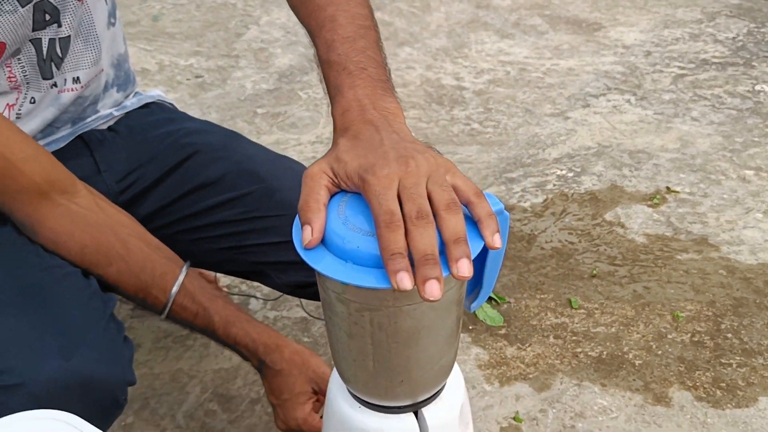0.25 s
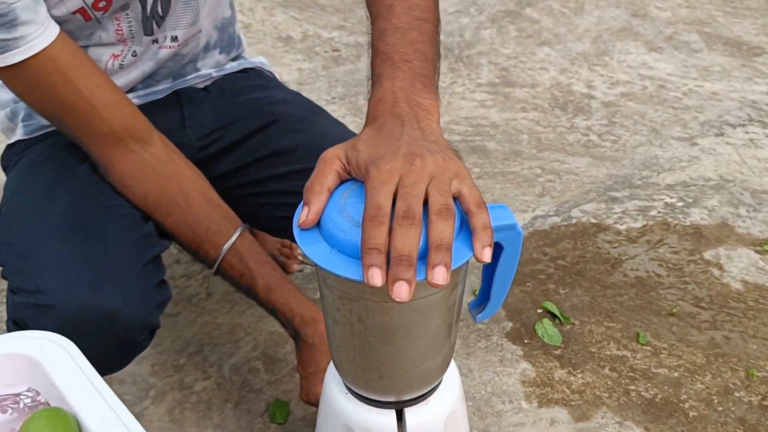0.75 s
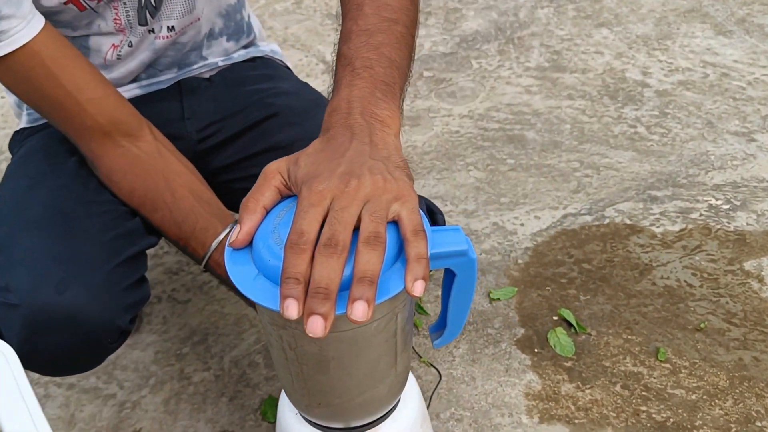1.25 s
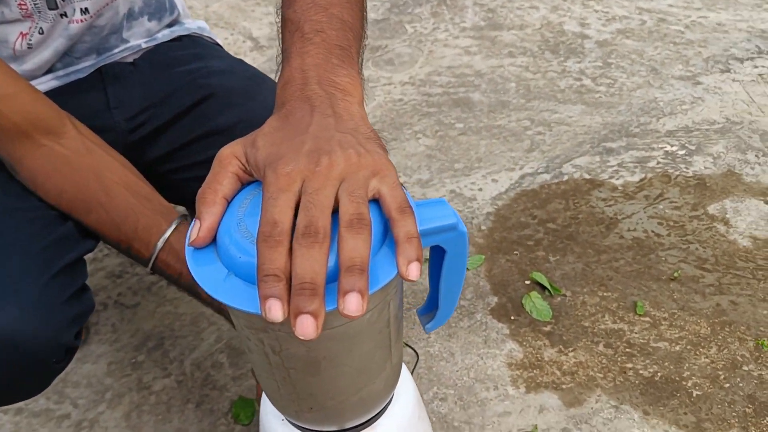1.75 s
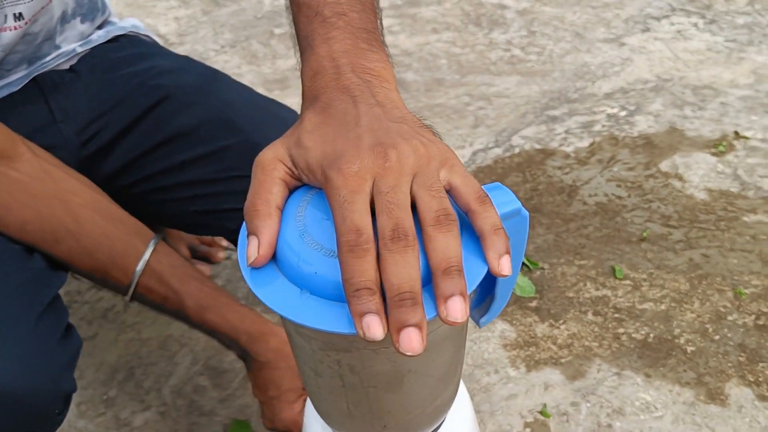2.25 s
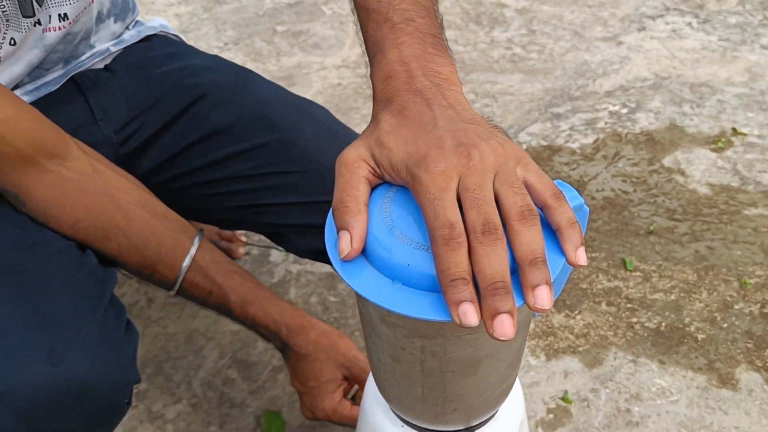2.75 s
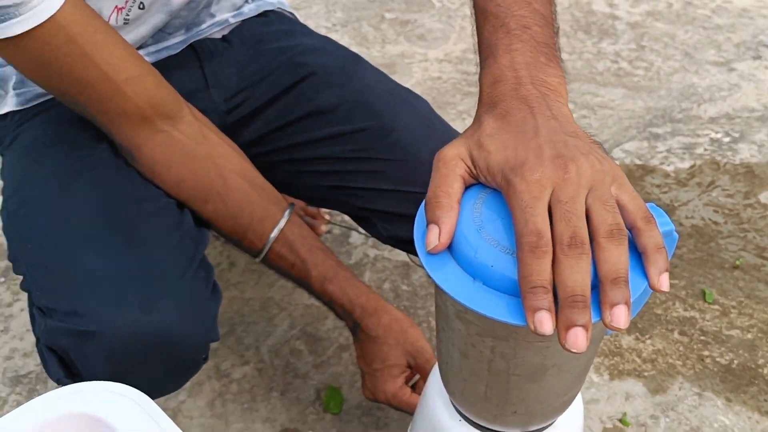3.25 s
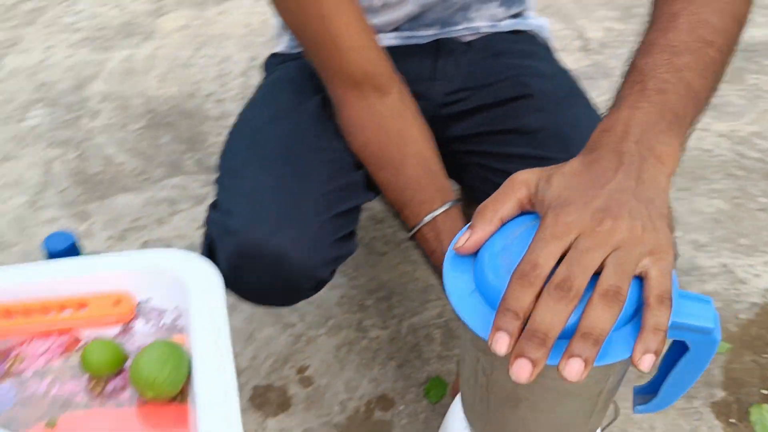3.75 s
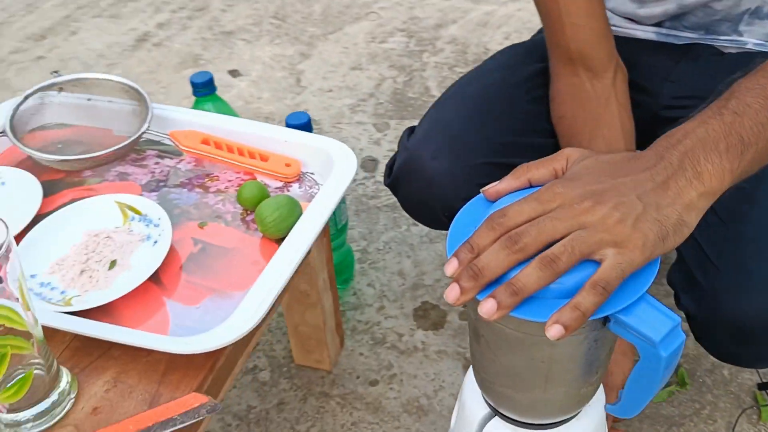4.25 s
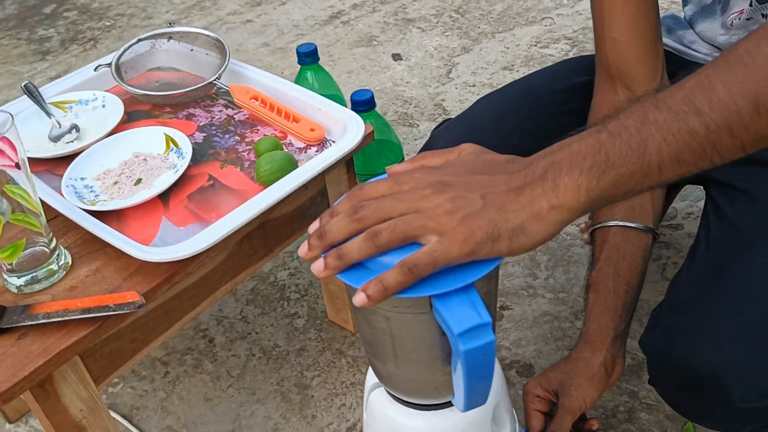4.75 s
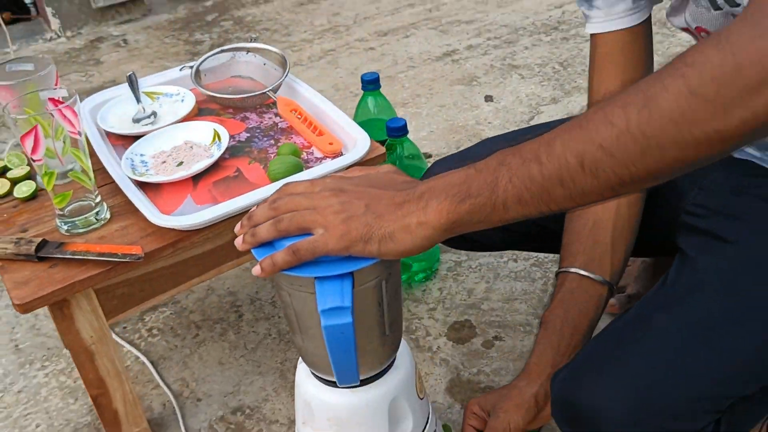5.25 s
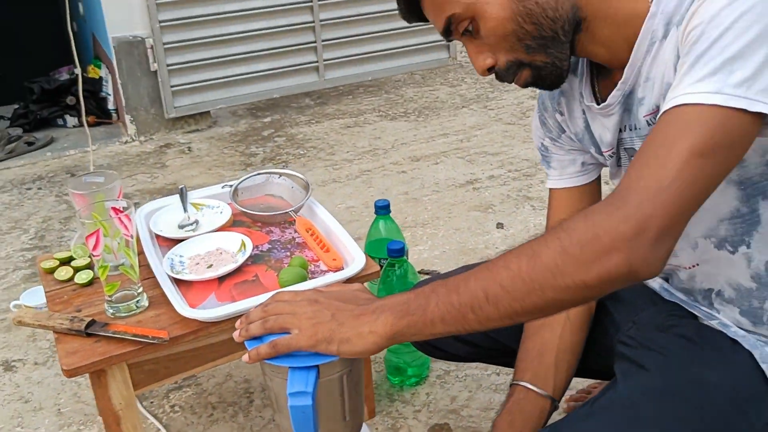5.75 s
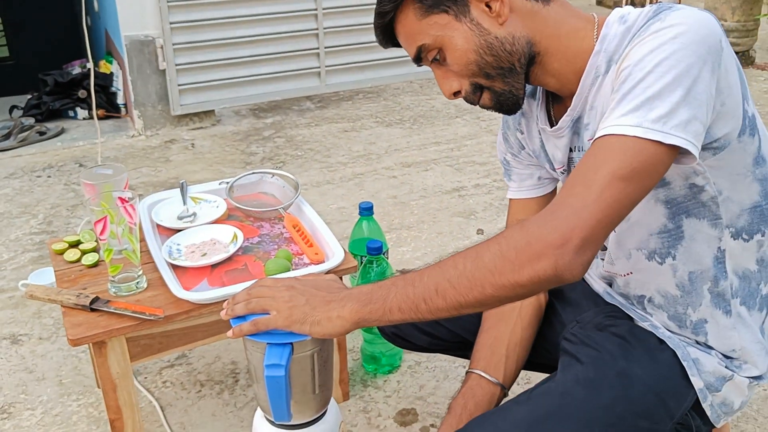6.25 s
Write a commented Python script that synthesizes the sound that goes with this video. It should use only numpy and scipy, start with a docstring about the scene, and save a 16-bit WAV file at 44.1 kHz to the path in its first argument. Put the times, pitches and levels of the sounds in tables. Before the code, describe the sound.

A mixer grinder is already at full speed, close and dry, and never stops. A strong whine around 2.5 kHz buzzes at a hundred pulses a second, swaying in loudness and pitch six or seven times a second as the load sloshes. Beneath it are a low rotor hum, a growl of blade tones and a wet, midrange churning roar coloured by the steel jar. Lumps burst and ice chips click in the first half second, with scattered ticks until about 3.5 and a last one near 4.4. From 0.6 the low slosh eases; around 1.6 to 2.3 the pitch sinks slightly and the wobble quickens to about nine a second. At 3.7 the churning drops noticeably and grows smoother, the swaying shallower. At 5.3 the sound vanishes for about three hundredths of a second, then returns with a softer, rougher, stuttering whine and calmer churn, still running at 6.5.

```python
"""A churning roar and a pulsing electric whine: a mixer grinder blends ice and leaves in a steel jar.
The sloshing load drags on the motor, so its mains-pulsed whine sweeps in and out of a jar resonance.
Blade tones follow the same shaft; filtered noise makes the turbulence, and decaying noise bursts the ice.
The churning calms and the ice ticks thin out as the mix gets smooth; late on, the sound cuts out briefly."""
import sys
import numpy as np
from scipy import signal
from scipy.fft import rfft, irfft
from scipy.io import wavfile
from scipy.ndimage import uniform_filter1d, minimum_filter1d

SR = 44100
rng = np.random.default_rng(int(sys.argv[2]) if len(sys.argv) > 2 else 0)


def digitize_waveform(pressure):
    """Quantize a signal to 16-bit integers and store it at the path in sys.argv[1].

    Rows of a 2-D input are taken as channels; values are limited to [-1, 1].
    """
    field = np.atleast_2d(pressure).T
    bounded = np.clip(field, -1, 1)
    quanta = np.round(bounded * 32767).astype(np.int16)
    wavfile.write(sys.argv[1], SR, quanta)


N = 286322
TIME = np.arange(N) / SR
FREQS = np.fft.rfftfreq(N, 1 / SR)


def gain_of(db):
    """Decibels to amplitude."""
    return 10 ** (np.asarray(db) / 20)


def evened(x):
    """Scales to rms 1."""
    return x / np.sqrt(np.mean(abs(x) ** 2) + 1e-20)


def curve(rows):
    """The columns of a table (s, value, ..) at every sample."""
    s, *columns = np.transpose(rows)
    return [np.interp(TIME, s, column) for column in columns]


def read(points, hz):
    """Interpolates a spectrum table on a log-frequency axis."""
    f, value = np.transpose(points)
    return np.interp(np.log(hz + 1), np.log(f), value)


def coloured(x, db):
    """Filters by a gain in dB at each frequency."""
    return irfft(rfft(x) * gain_of(db), N)


def wander(rate_hz):
    """Smooth random signal of rms 1, changing up to about rate_hz."""
    spectrum = rfft(rng.standard_normal(N))
    return evened(irfft(spectrum / (1 + (FREQS / rate_hz) ** 2), N))


# Motor tone levels. Each row: time in seconds, whine in dB, overtones in relative dB, roughness 0-1.
MOTOR_LEVELS = [(0, -13, -2, .5), (.55, -8.5, 4.5, 0.3), (1.3, -10, 2, 0.2), (1.6, -13.5, 2, 0.2),
                (2.2, -13.8, -2, 0.02), (3.7, -14, -1.5, .1), (5.25, -14.5, -2, .1), (5.45, -16.5, -9, 0.9),
                (5.9, -15, -3, 0.8), (6.49, -16, -9, .8)]
# Radiation of the whine by the jar. Each row: frequency in Hz, gain in dB.
WHINE_RADIATION = [(2270, -16), (2370, -1), (2430, 5), (2490, 2.5), (2530, 2), (2560, -7), (2605, -29),
                   (2660, -19.5), (2730, -23), (2850, -40)]
# Overtones of the shaft. Each row: multiple of the shaft speed, relative level in dB.
MOTOR_OVERTONES = [(24, -48), (36, -42), (48, -54), (60, -68), (72, -77)]
# Low sounds. Each row: time in seconds, once-a-turn hum of the unbalanced rotor in dB,
# gulping of the vortex in relative dB.
LOW_LEVELS = [(0, -25, -44.5), (.6, -29.5, -44.5), (2.25, -36, -47.5), (2.6, -34, -54), (5, -32, -51),
              (6.49, -34, -51)]
MAINS_HZ = 50


def motor(angle, pulsing=0.93, damping_db=0.3, wetting_db=3):
    """Twelve rotor slots sing, pulsing twice per mains cycle; liquid on the wall damps the overtones."""
    slots, jitter_rad, overtone_pulsing, flutter_db = 12, 0.5, 0.55, 2.6
    stutter_hz, stutter_db = 50, 5.5
    pull = np.cos(2 * np.pi * 2 * MAINS_HZ * TIME)
    whine_db, overtones_db, rough = curve(MOTOR_LEVELS)
    shaken = angle + jitter_rad * rough * wander(stutter_hz) / slots

    pulsed = np.cos(slots * shaken) * (1 + pulsing * pull)
    whine = coloured(pulsed, read(WHINE_RADIATION, FREQS))
    dips_db = stutter_db * rough * np.maximum(wander(stutter_hz), 0)
    whine *= gain_of(whine_db - dips_db - damping_db * slosh(lag=0.24, power=0.12))

    overtones = np.zeros(N)
    for multiple, db in MOTOR_OVERTONES:
        overtones += gain_of(db + flutter_db * wander(30)) * np.cos(round(multiple) * shaken)
    overtones *= 1 + overtone_pulsing * pull
    overtones *= gain_of(overtones_db - wetting_db * slosh(lag=0.28))

    hum = gain_of(curve(LOW_LEVELS)[0] + 0.5 * wander(9.8)) * np.cos(angle)
    return np.sqrt(2) * (whine + jar(overtones) + hum)


# Mean motor speed, sinking as the mix thickens. Each row: time in seconds, shaft turns per second in Hz.
SHAFT_SPEED = [(0.0, 225.5), (0.35, 223.9), (1.35, 223.0), (1.58, 220.7), (1.8, 216.5), (2.3, 214.4),
               (2.85, 214.1), (3.05, 213.0), (3.66, 213.9), (3.93, 213.8), (4.17, 210.0), (4.35, 212.4),
               (4.56, 210.1), (4.75, 212.3), (5.4, 207.3), (5.77, 210.9), (6.15, 211.4), (6.45, 206.5)]
SWING_HZ = 4  # peak swing of the shaft speed in a slosh of full depth


def shaft_speed():
    """Each slosh drags the motor under its mean speed and lets it go again (Hz)."""
    return curve(SHAFT_SPEED)[0] + SWING_HZ * slosh() + 0.2972 * wander(5.06)


# Rocking of the load, shallower as it gets smooth. Each row: time in seconds, sloshes per second, depth 0-1.
SLOSHING = [(0.0, 6.683, 0.75), (0.5, 6.542, 0.85), (1.3, 7.221, 0.8), (1.8, 8.025, 1.0), (2.4, 8.751, 0.9),
            (3.4, 9.127, 0.6), (4.2, 9.173, 0.42), (5.2, 9.283, 0.25), (5.5, 11.4, 0.15), (6.49, 8.3, 0.12)]


def slosh(lag=0.0, power=0.81):
    """Load rocking, highest when blades run free; lag in cycles, power < 1 keeps shallow sloshes felt."""
    rate_hz, depth = curve(SLOSHING)
    cycles = np.cumsum(rate_hz) / SR
    return depth ** power * np.cos(2 * np.pi * (cycles - lag))


# Blades beating the liquid. Each row: multiple of the shaft speed, steady part in relative dB,
# turbulent part in relative dB.
BLADE_TONES = [(2, -23.5, -27), (3, -24, -15.5), (4, -7.5, -7), (5, -21.5, -14.5), (6, -13.5, -9),
               (7, -30, -17), (8, -23.5, -25), (10, -28, -20), (20, -29.5, -37.5)]


def blades(angle, surge, smear_hz=32, surge_db=0.2, follow=0.47, level_db=-16.5):
    """Each blade tone has a steady core and a skirt smeared by turbulence."""
    out = np.zeros(N)
    for multiple, steady_db, turbulent_db in BLADE_TONES:
        eddies = wander(smear_hz) + 1j * wander(smear_hz)
        height = np.sqrt(2) * gain_of(steady_db) + gain_of(turbulent_db) * eddies
        phase = round(multiple) * angle + 2 * np.pi * rng.random()
        out += (height * np.exp(1j * phase)).real
    churn_db = curve(TURBULENCE_LEVELS)[1]
    return out * gain_of(level_db + follow * (churn_db - churn_db.mean()) + surge_db * surge)


# Turbulence in three bands. Each row: time in seconds, low slosh, churn and spray, each in relative dB.
TURBULENCE_LEVELS = [(0, -20.5, -11.5, -19), (0.58, -21, -11.5, -19.5), (0.75, -25.5, -12.5, -21.8),
                     (2.4, -27, -13, -22.5), (3.62, -26, -12.5, -23.5), (3.78, -26, -18, -25),
                     (5.25, -26.5, -18.5, -26), (5.45, -28.5, -20.5, -28), (6.49, -31.5, -21, -28.5)]
# Spectrum of the churning. Each row: frequency in Hz, relative density in dB per Hz.
CHURN_SPECTRUM = [(25, -29), (62, -37), (110, -19.5), (165, -16.5), (240, -9), (340, -4), (560, -5.5),
                  (950, 3.5), (1400, 3), (2200, -1), (2900, -11), (4700, -16.5), (6500, -24), (8500, -28.5),
                  (11500, -43), (15500, -50)]


def churning(surge, low_hz=700, high_hz=2700):
    """Low slosh, churn and spray swell with the falling liquid and burst with each splash."""
    low = 1 / (1 + (FREQS / low_hz) ** 8)
    high = 1 - 1 / (1 + (FREQS / high_hz) ** 8)
    noise = rfft(jar(bubbling())) * gain_of(read(CHURN_SPECTRUM, FREQS))
    deep = evened(irfft(noise * low, N))
    churn = evened(irfft(noise * (1 - low - high), N))
    spray = evened(irfft(noise * high, N))

    deep_db, churn_db, spray_db = curve(TURBULENCE_LEVELS)
    splash_db = splashes()
    deep *= gain_of(deep_db + 0.43 + 1.2 * surge + 0.2 * splash_db)
    churn *= gain_of(churn_db - 2.37 + 2.7 * surge + 0.94 * splash_db + 0.6 * wander(22))
    spray *= gain_of(spray_db - 0.26 + 1.9 * surge + 1.0 * splash_db + 1.04 * wander(60))
    return deep + churn + spray


def bubbling(patchy_db=1.7):
    """Bubble clouds: noise in random patches, each a few hundred Hz by a few hundredths of a second."""
    z = signal.stft(rng.standard_normal(N), nperseg=512, noverlap=384)[2]
    clouds = uniform_filter1d(rng.standard_normal(z.shape), size=7, axis=0)
    clouds = uniform_filter1d(clouds, size=13, axis=1)
    patchy = z * gain_of(patchy_db * evened(clouds))
    return signal.istft(patchy, nperseg=512, noverlap=384)[1][:N]


# Coarse lumps of the mix falling into the blades. Each row: time in seconds, rise in dB before levelling.
FALLING_LUMPS = [(0.099, 5), (0.273, 4.5), (0.557, 4), (1.614, 1), (2.808, 3), (3.13, 1.5), (3.59, 4),
                 (4.387, 3.5)]


def splashes(lump_s=0.025, splash_db=2.5, uneven=0.52):
    """Rise in dB: a splash of random strength in every slosh, and a burst with each coarse lump."""
    falls = np.maximum(slosh(lag=0.19, power=0.46), 0) ** 3
    rise_db = splash_db * falls * (1 + uneven * wander(6.5))
    for s, db in FALLING_LUMPS:
        rise_db += db * np.exp(-((TIME - s) / lump_s) ** 2)
    return rise_db - uniform_filter1d(rise_db, size=SR // 2)  # about the half-second mean


# Ice chips hitting the wall. Each row: time in seconds, chip level in relative dB,
# level of the sharp edge in relative dB.
ICE_HITS = [(0.119, -14, -50), (0.388, -23, -50), (0.8174, -35, -52), (1.2444, -24, -53),
            (1.4217, -18.5, -52), (1.712, -16, -54), (2.101, -14, -58), (2.998, -14, -54),
            (3.1294, -16, -55), (3.4466, -15, -56), (4.3855, -19, -55)]
# Spectrum of a chip. Each row: frequency in Hz, relative density in dB per Hz.
CHIP_SPECTRUM = [(500, -34), (2000, 7), (4500, -2.5), (8400, -4), (10000, -19), (15500, -35)]


def ice(surge, chips_db=1, chip_decay_s=0.0027, edge_db=8, edge_decay_s=0.002,
        grit_per_s=260, grit_db=-15, spread_db=3, grit_decay_s=0.0033):
    """A few large chips and a haze of fine grit strike the wall; the liquid damps each ring."""
    chips, edges = np.zeros((2, N))
    for s, db, sharp_db in ICE_HITS:
        age_s = np.maximum(TIME - s + 0.0015, 0)  # starts 1.5 ms before the listed time
        chips += gain_of(db + chips_db) * (age_s > 0) * np.exp(-age_s / chip_decay_s)
        edges += gain_of(sharp_db + edge_db) * (age_s > 0) * np.exp(-age_s / edge_decay_s)

    sizes = gain_of(spread_db * np.minimum(rng.exponential(1, N), 5))
    hits = sizes * (rng.random(N) < grit_per_s / SR)
    grit = evened(signal.lfilter([1], [1, -np.exp(-1 / (grit_decay_s * SR))], hits))
    grit *= gain_of(curve(TURBULENCE_LEVELS)[2] + grit_db + 1.7 * surge)

    ring_db = read(CHIP_SPECTRUM, FREQS)
    ring = coloured((chips + grit) * rng.standard_normal(N), ring_db)
    ring /= np.sqrt(np.mean(gain_of(ring_db) ** 2))
    return jar(ring) + edges * rng.standard_normal(N)


# Resonances of jar and lid. Each row: centre in Hz, width in Hz, gain in dB.
JAR_RESONANCES = [(338, 46, 4), (399.3, 47, 9.5), (491, 42, 4), (620, 40, -1.5), (1085, 75, 2.5),
                  (1221, 77, -5.5), (1313, 118, 6), (1554, 40, 4.5), (1607, 100, -6), (1720, 86, 1.5),
                  (1910, 67, -3), (1995, 55, 2.5), (2150, 40, 7.5), (2177, 100, -8), (2480, 140, 3.5),
                  (3000, 97, -3), (3550, 105, 5), (3760, 170, -1), (4225, 390, 6), (4464, 50, 7),
                  (4785, 76, 8.5), (5380, 100, 5), (6100, 130, -4), (7640, 79, 6), (7900, 160, -13.5),
                  (8120, 300, 4), (9200, 200, -0.5), (10600, 400, 2), (11650, 400, 5), (12620, 180, 8)]


def jar(x):
    """The fixed resonances of the steel jar and its lid."""
    gain_db = np.zeros(len(FREQS))
    for hz, width_hz, db in JAR_RESONANCES:
        gain_db += db / (1 + (2 * (FREQS - hz) / width_hz) ** 2)
    return coloured(x, gain_db)


def gulps(centre_hz=110, width_hz=30, swing_db=8.5):
    """The vortex gulps air with a low thud whenever the blades run free."""
    band = np.exp(-((FREQS - centre_hz) / width_hz) ** 2)
    thud = evened(irfft(rfft(rng.standard_normal(N)) * band, N))
    return thud * gain_of(curve(LOW_LEVELS)[1] - 2.0 + swing_db * slosh(lag=-0.14))


def scene():
    """One shaft drives every tone; liquid falls back just after each crest of speed and drives the noise."""
    angle = 2 * np.pi * np.cumsum(shaft_speed()) / SR
    surge = slosh(lag=0.14, power=0.8)
    tones = motor(angle) + jar(blades(angle, surge))
    noises = churning(surge) + ice(surge) + gulps()
    return (tones + noises)[None]


# Brief cut in the sound. Each row: time in seconds, gain in dB.
CUT_OUT = [(5.307, 0), (5.309, -47), (5.332, -47), (5.336, -18), (5.349, 0)]
EDGE_HZ = 15720  # upper band limit


def record(dry, ceiling=0.92):
    """A fast limiter holds the peaks, the sound cuts out for a moment, then the band limit."""
    allowed = np.minimum(1, ceiling / (abs(dry) + 1e-9))
    held = minimum_filter1d(allowed, size=200)
    limited = dry * uniform_filter1d(held, size=200)
    broken = limited * gain_of(curve(CUT_OUT)[0])
    lowpass = signal.firwin(1023, EDGE_HZ, window=("kaiser", 9), fs=SR)
    return signal.oaconvolve(broken, lowpass[None], "same")


dry = scene()
out = record(dry)
digitize_waveform(out)
```